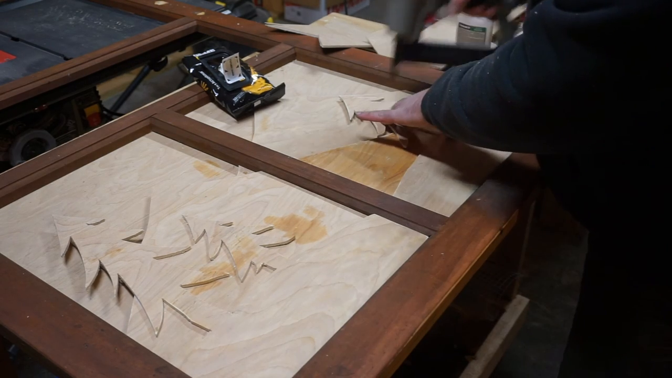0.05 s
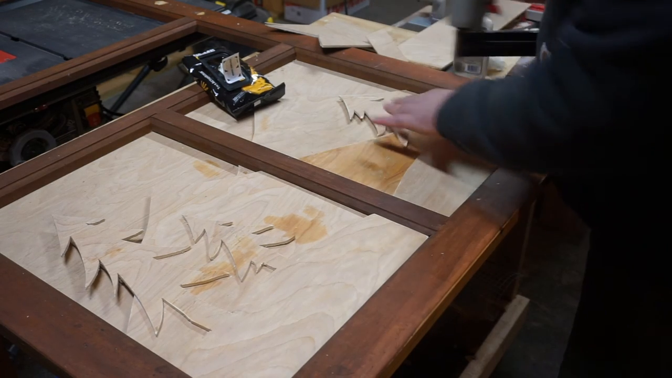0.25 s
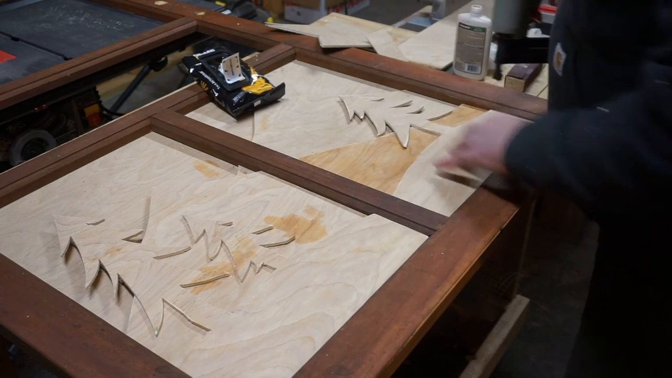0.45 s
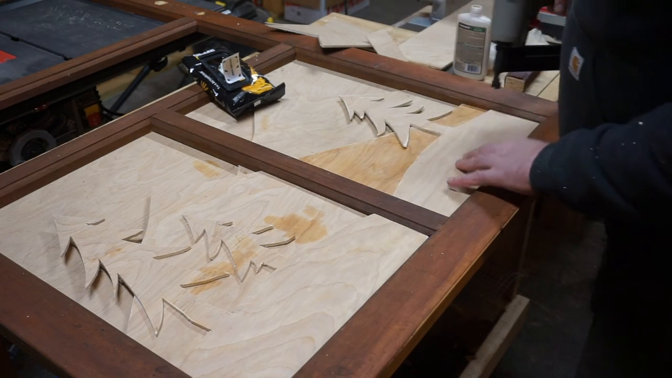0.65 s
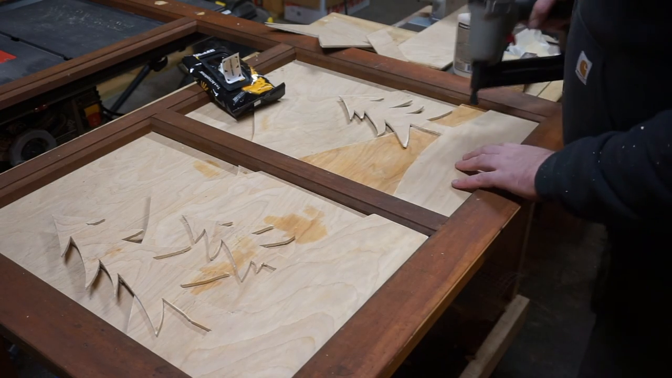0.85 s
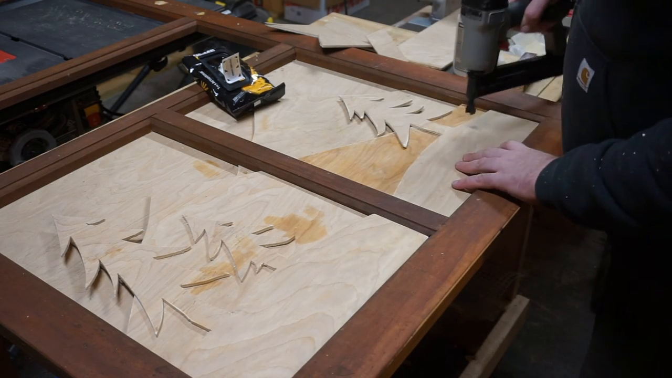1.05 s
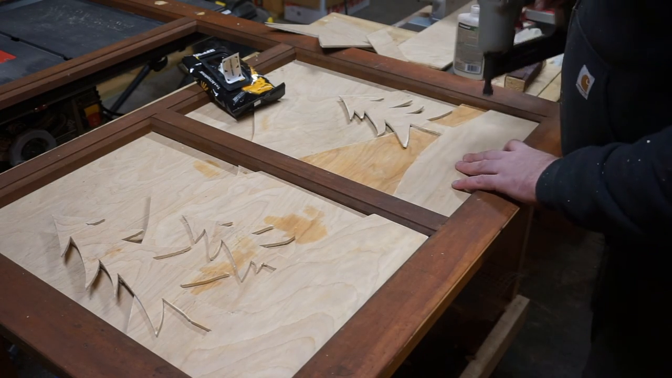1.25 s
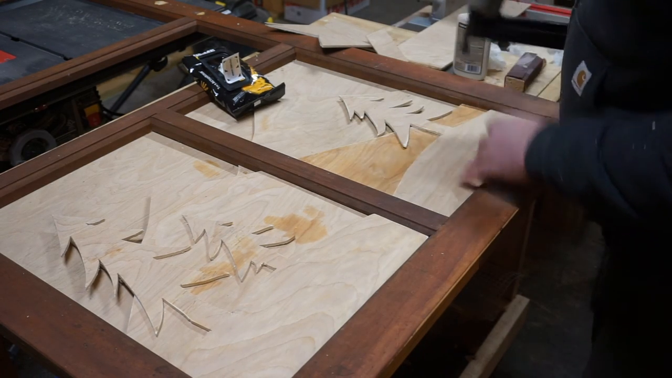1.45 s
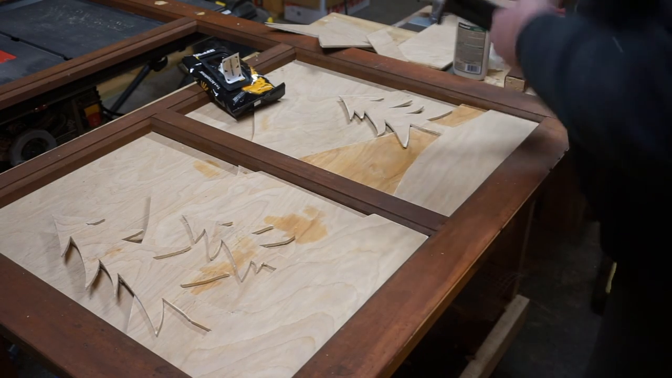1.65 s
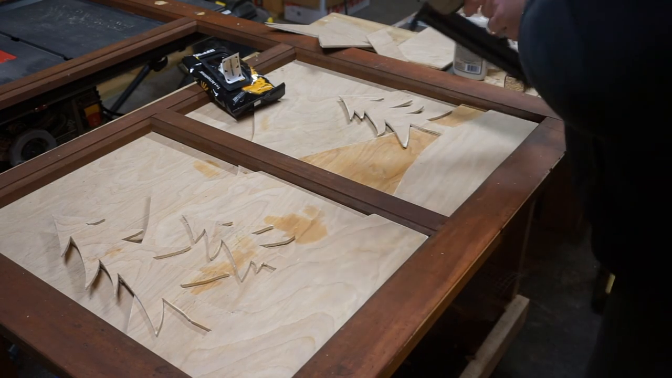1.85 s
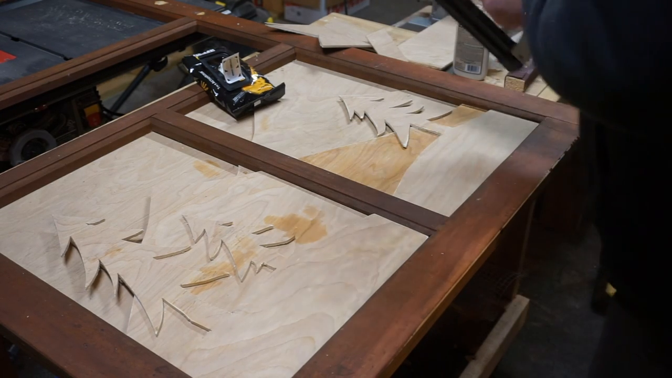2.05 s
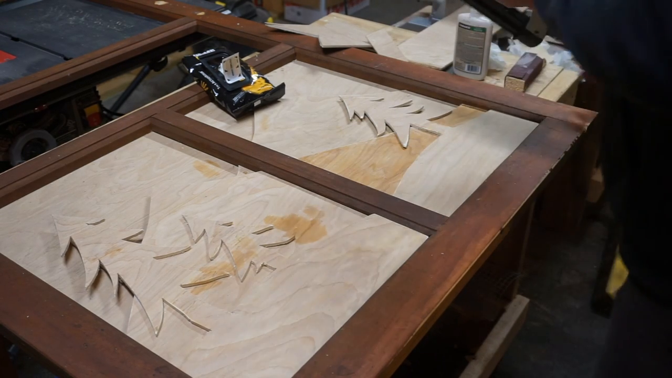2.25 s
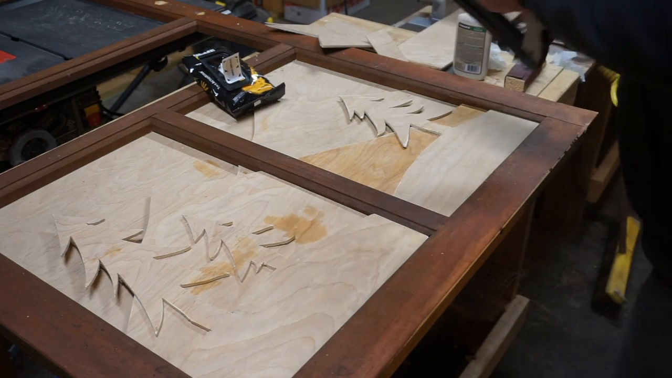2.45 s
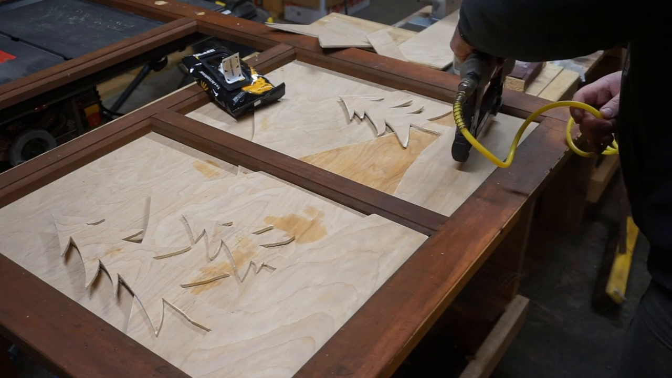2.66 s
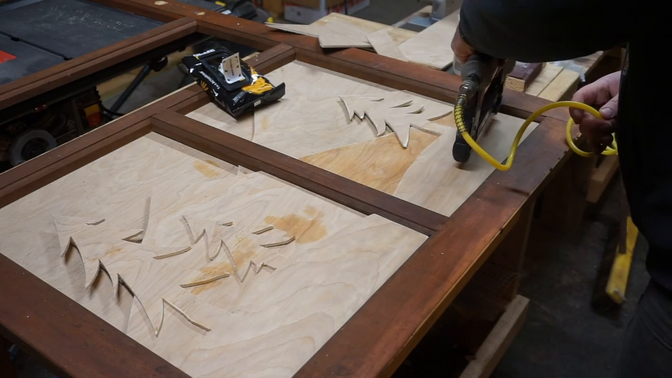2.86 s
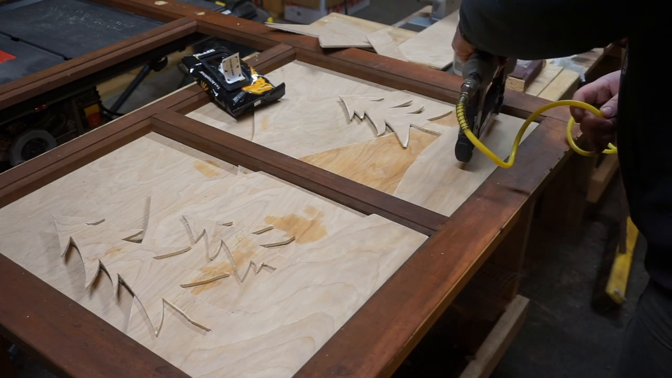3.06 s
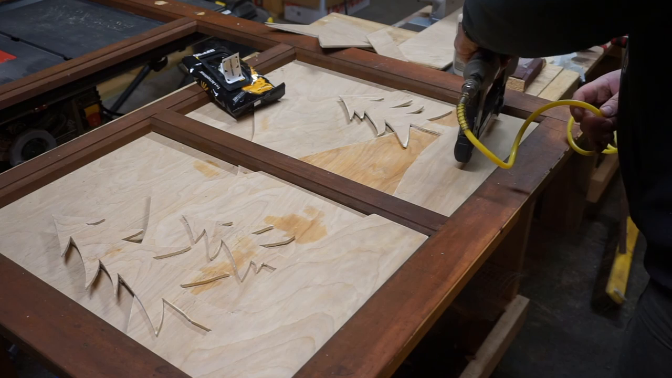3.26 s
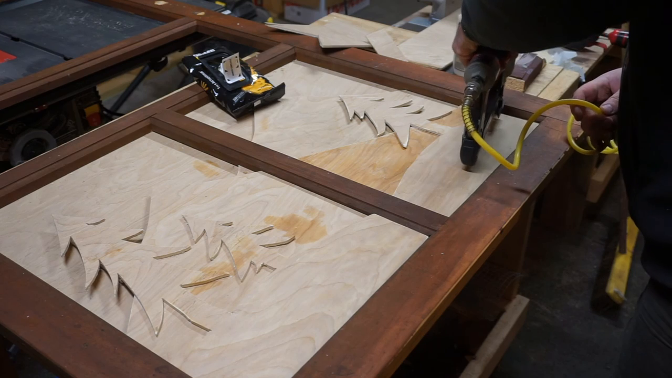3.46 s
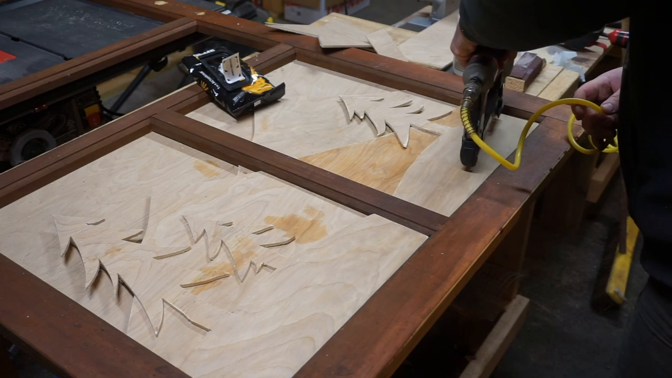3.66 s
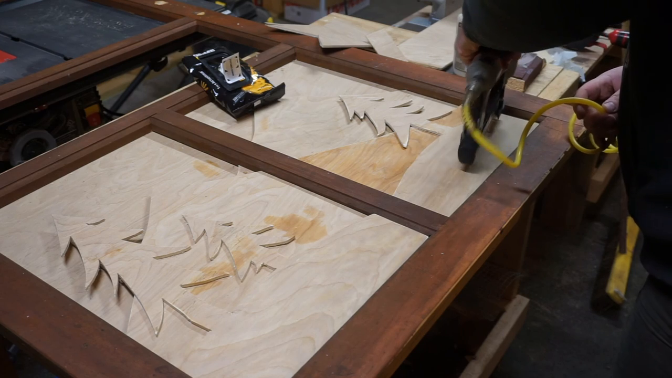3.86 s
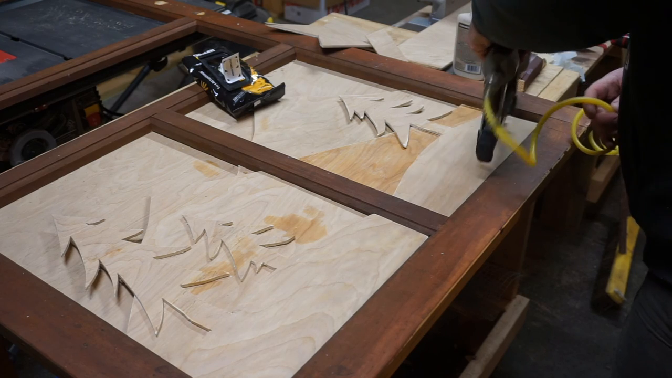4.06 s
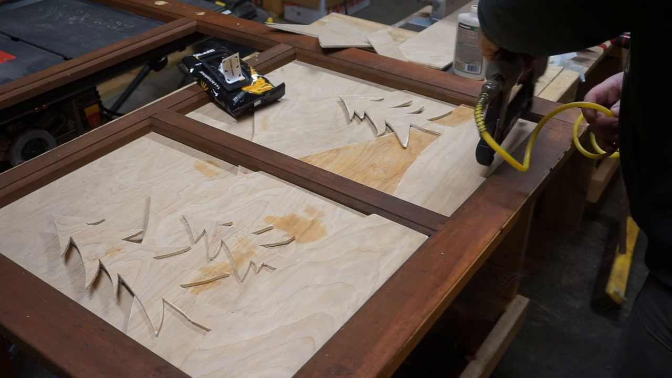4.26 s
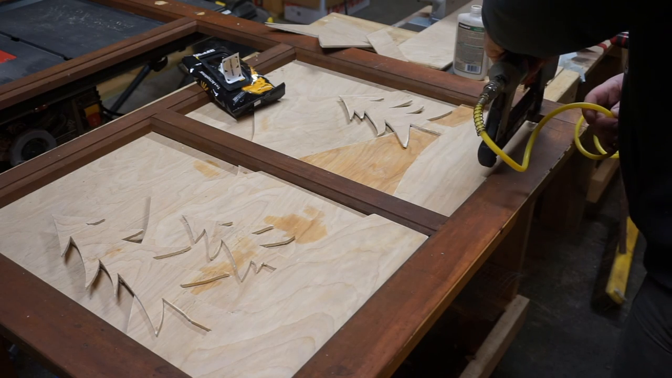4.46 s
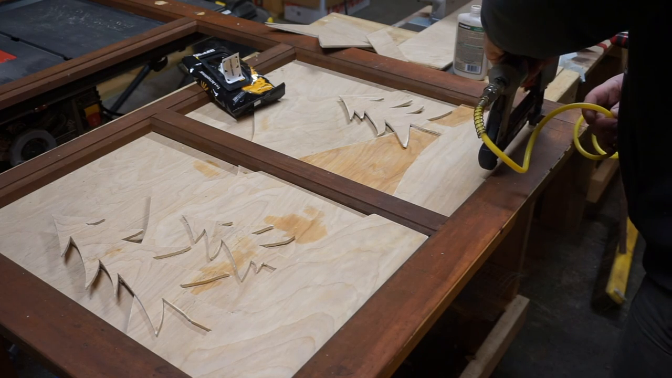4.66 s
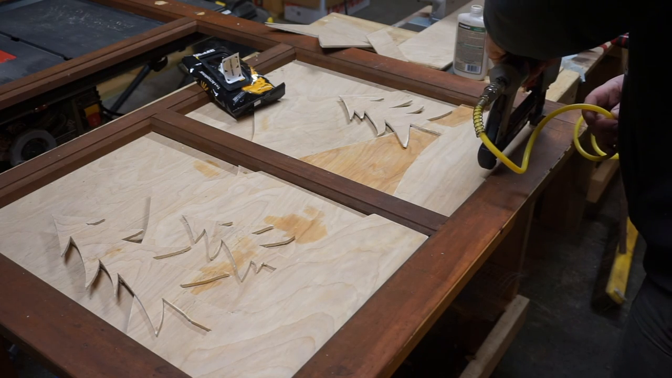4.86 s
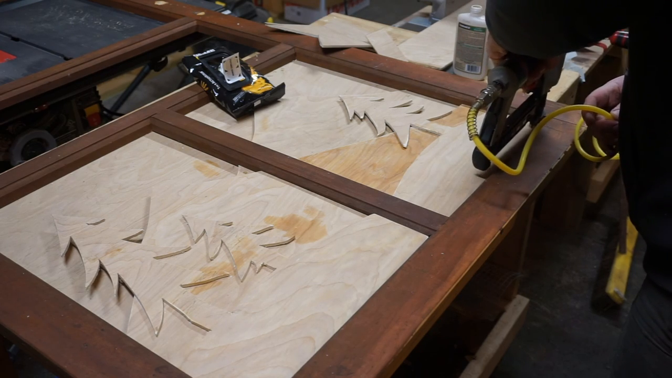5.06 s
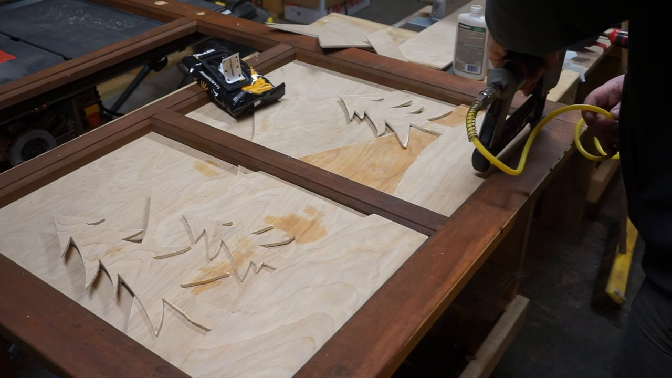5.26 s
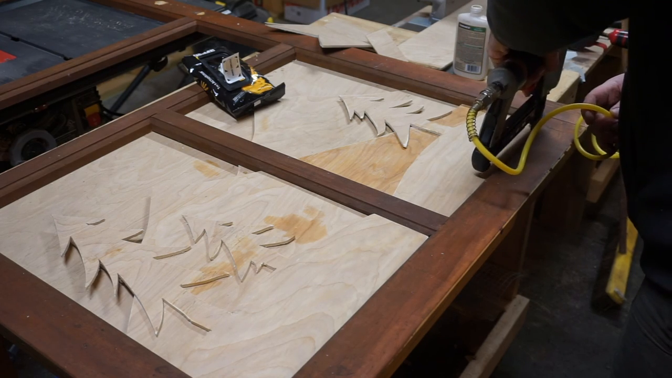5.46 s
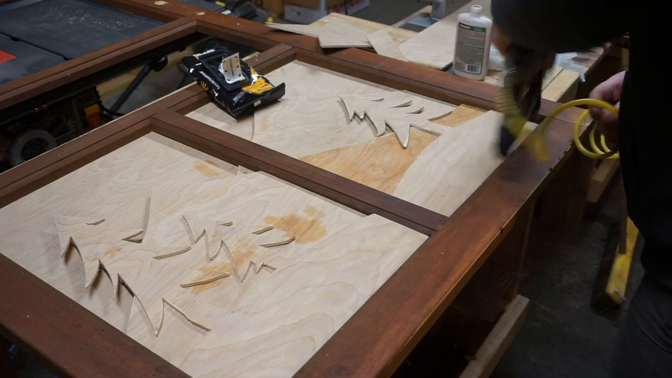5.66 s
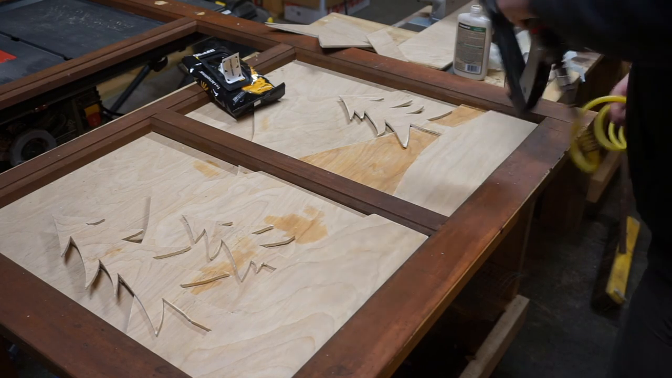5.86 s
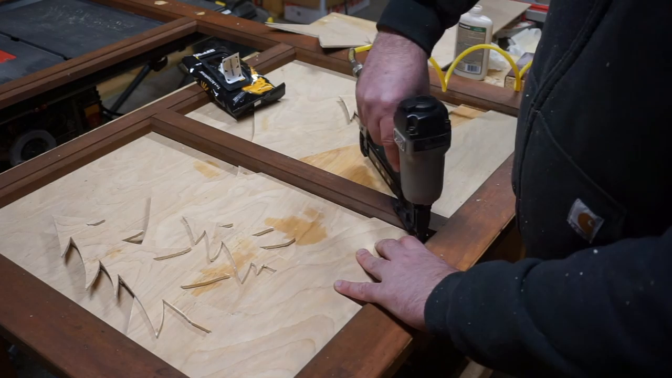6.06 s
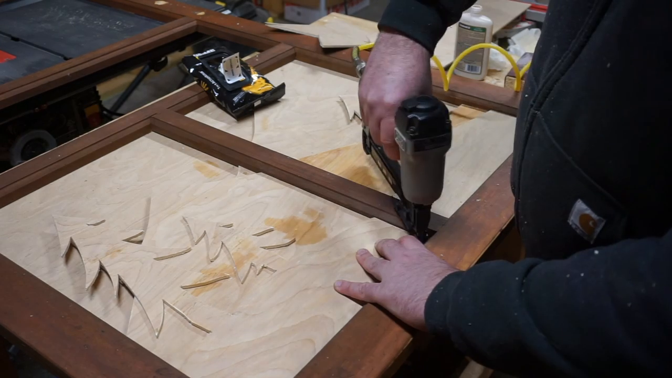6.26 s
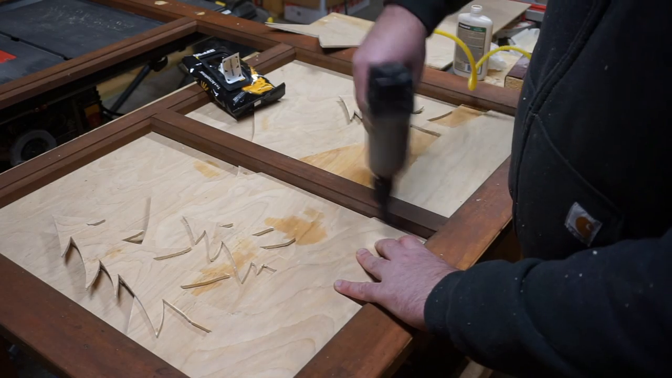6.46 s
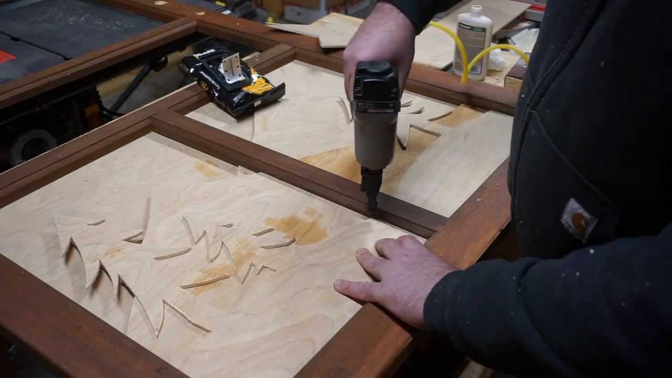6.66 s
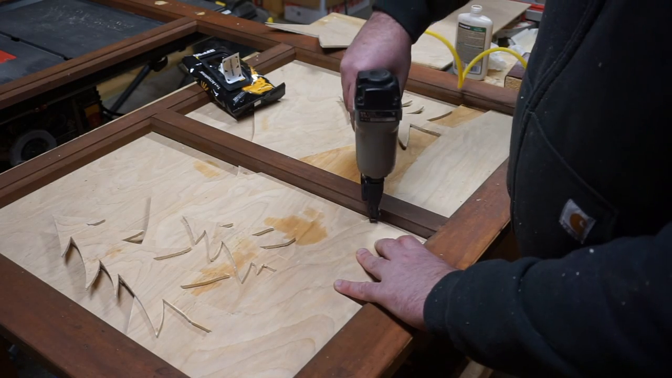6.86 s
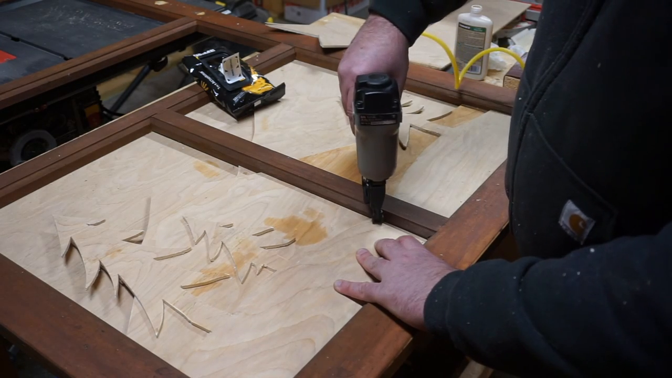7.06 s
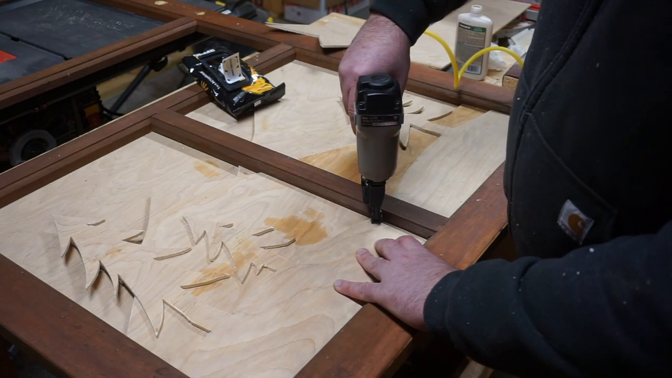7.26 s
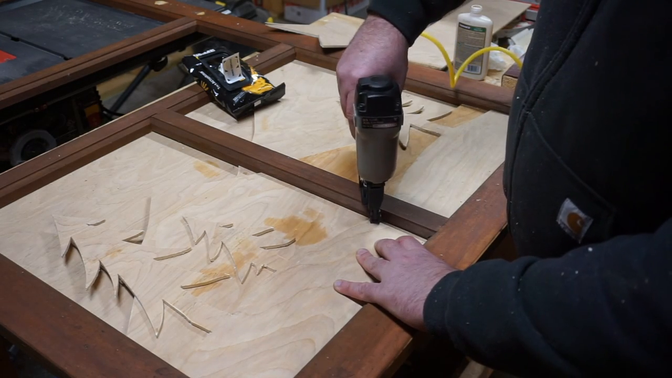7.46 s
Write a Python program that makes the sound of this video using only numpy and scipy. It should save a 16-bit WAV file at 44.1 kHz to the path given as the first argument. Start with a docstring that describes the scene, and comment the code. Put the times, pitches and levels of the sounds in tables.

```python
"""A pneumatic nailer fires into plywood in a hard-walled workshop: a short rush of air, a sharp blow built from
a piston pulse and a crack, then a long noise echo that swells as a gain control lets go.
Between shots, clicks of shaped noise tick, some with a short damped knock or metallic ring, lumpy mid-range
noise swells and fades, and the board groans. A steady floor, a faint metal hum and a soft hiss lie beneath;
hard cuts at edits stop the echoes short."""
import sys
import numpy as np
from scipy import signal
from scipy.io import wavfile
from scipy.ndimage import uniform_filter1d, minimum_filter1d

SR = 44100
rng = np.random.default_rng(int(sys.argv[2]) if len(sys.argv) > 2 else 0)


def to_wav(sig):
    """Store sig (one row per channel, or 1-D mono) as 16-bit WAV at the path in sys.argv[1].

    Samples outside -1..1 are clipped; the rate is SR.
    """
    pcm = np.clip(np.atleast_2d(sig), -1, 1) * 32767
    pcm = np.round(pcm).astype(np.int16)
    wavfile.write(sys.argv[1], SR, pcm.T)  # frames by channels


def invert_db(level):
    """Linear amplitude ratio for a level in decibels (20 dB per decade), elementwise."""
    return 10 ** (np.asarray(level, dtype=float) / 20)


N = 331191

# All levels are those in the mix, ahead of its final gain and the gain control.
# Edits that stop whatever is sounding: (time [s])
CUTS = (1.076, 2.682, 4.822, 6.139, 8.0)
# Left-right likeness of all noise: (frequency [Hz], likeness [0 to 1])
LIKENESS = [(60, 0.98), (170, 0.99), (490, 0.86), (1400, 0.46), (3000, 0.18), (5000, 0.031), (11000, 0.047)]
# Decay of the room by band: (frequency [Hz], t60 [s])
ROOM_DECAY = [(60, 1.6), (170, 1.29), (330, 1.41), (520, 1.41), (900, 1.247), (1300, 1.274), (1650, 1.273),
              (2100, 1.14), (3000, 1.073), (5000, 0.87), (7700, 0.66), (11000, 0.49)]

# Colour of the steady floor: (frequency [Hz], density [dB per Hz])
FLOOR_COLOUR = [(12, -40.5), (20, 0), (970, -22), (1520, -28.5), (2590, -21), (3300, -26.5), (4910, -27),
                (10600, -25.5), (11500, -15.5), (15000, -46.5), (22000, -120)]
FLOOR_DB = -65.5
# Bands of the faint metal hum: (frequency [Hz], width [Hz], level [dB])
HUM_BANDS = [(1540, 50, 0), (1960, 50, -8), (2400, 70, -1), (2780, 150, -7), (3680, 250, -14)]
HUM_HOLD_S, HUM_DB, HUM_FADE_DB_PER_S = .2, -71, 40
# Soft hiss near the microphone: (start [s], rise [s], hold [s], level [dB])
SOFT_HISS = [(2.679, .001, .01, -63.5), (2.676, .001, 2.05, -72), (4.815, .001, 1.3, -77),
             (6.143, .001, .01, -58)]
# Colour of the soft hiss: (frequency [Hz], density [dB per Hz])
SOFT_HISS_COLOUR = [(530, -36.5), (900, -15), (1140, 4), (2230, 0.5), (3840, -6), (10600, -36), (11100, 1),
                    (11500, -48), (15000, -71), (22000, -120)]
SOFT_HISS_FADE_DB_PER_S = 29.5

# Loads of the tool on the board, one list each: (time [s], groan level [dB], deep rumble above it [dB])
LOADS = [
    [(2.68, -61.5, 3.5), (3.044, -58.5, 6.5), (3.216, -61.5, 6), (3.4, -56.5, 4.5), (3.466, -49, -5.5),
     (3.8, -60, 4.5)],
    [(4.98, -69, -5), (5.06, -58.5, -14), (5.12, -62.5, -12), (5.206, -58, -11), (5.31, -58.5, -9.5),
     (5.432, -61.5, -11), (5.6, -73.5, 14)],
    [(6.14, -46.5, -2.5), (6.33, -50, -6)],
]
# Colours of rumble, groan and creak: (frequency [Hz], density [dB per Hz])
RUMBLE_COLOUR = [(30, -28), (60, -17.5), (92, -3), (125, -14.5), (170, -37.5)]
GROAN_COLOUR = [(90, -33.5), (130, 7), (170, -2), (250, 2), (320, -9), (450, -54.5)]
CREAK_COLOUR = [(200, -36), (320, -8.5), (480, -5), (800, -11.5), (1200, -24.5), (2000, -43), (3000, -42)]
# The creak follows groan and a share of the rumble; growth is dB of creak per dB of load.
CREAK_FROM_DB, CREAK_GROWTH, CREAK_RUMBLE_SHARE = -51, 1.73, 0.33

# Swells of lumpy mid-range noise that rise, hold and fade: (start [s], rise [s], hold [s], level [dB])
SWELLS = [(1.443, 0.24, .01, -61), (1.7, 0.17, .02, -58.5), (1.914, 0.12, .01, -46.5),
          (2.098, 0.011, 0.092, -38), (2.474, .01, 0.16, -50.5)]
# Colour of the swelling noise: (frequency [Hz], density [dB per Hz])
SWELL_COLOUR = [(60, -26), (150, -10), (400, -10), (650, -9), (850, -5), (1100, -8.5), (1600, -4),
                (2100, -6.5), (3000, -8.5), (6200, -16.5), (10600, -20), (11500, -13.5)]
SWELL_RISE_DB, SWELL_FADE_DB_PER_S = 15, 49

# Colour of every tick: (frequency [Hz], density [dB per Hz])
TICK_COLOUR = [(180, -30.5), (300, -7.5), (928, -16.5), (1560, -3.5), (3610, -7), (5970, -3), (6540, -6.5),
               (10500, -4), (11500, -7), (15000, -42), (22000, -120)]
# Light ticks of trigger, valve and hose: (time [s], level [dB], tilt [dB per octave])
TICKS = [(1.08, -58.5, -0.5), (2.497, -28, -0.5), (2.508, -33, 1), (2.957, -26, 3), (3.42, -36, -9.5),
         (3.743, -38, -2), (4.824, -53, -11), (4.838, -45, -6), (5.5654, -40, 11.5), (5.5712, -34, 11),
         (5.585, -34.5, 0.5), (6.108, -30, -5), (6.279, -37.5, 3), (7.059, -47.5, 1.5), (7.097, -45, 0)]
# Valve pops as the tool resets after a shot: (time [s], level [dB])
POPS = [(0.045, -6), (4.039, -12.5), (6.446, -6.5)]
POP_TILT_DB_PER_OCTAVE = 13.5
TICK_ROOM_DB, KNOCK_ROOM_DB, POP_ROOM_DB = -21, -23, -31  # echo relative to its tick
TOOL_HZ, TOOL_WIDTH_HZ, TOOL_DB = 2780, 300, 6  # the tool's metal colours the echo of each tick

# Ticks with a short damped knock or metallic ring:
# (time [s], tick level [dB], tick tilt [dB per octave], knock level [dB], knock centre [Hz])
KNOCKS = [(1.648, -51, 1.5, -66, 2700), (1.863, -42, 5, -49, 2800), (2.012, -41, 2, -42, 805),
          (2.105, -51, -4, -52, 840), (2.4835, -24.5, 0, -43, 1400), (2.867, -40, -9, -39.5, 500),
          (2.9687, -27.5, -9, -33, 500), (3.02, -40, -9, -51, 150), (3.278, -33, -8.5, -35.5, 480),
          (3.424, -51, -0.5, -19.5, 252), (3.767, -30, 1, -35, 150), (5.0349, -53, -1.5, -46, 150),
          (5.1251, -40, -6, -43.5, 850), (5.299, -66, 0, -50.5, 110), (6.264, -47, -3, -49, 290),
          (6.2975, -23, 3, -26.5, 250), (7.0226, -25.5, -5.5, -30.5, 1400), (7.498, -48, -1.5, -42, 180)]
# Damped modes of a knock, as of a plywood panel: (frequency [Hz], level [dB], t60 [s])
KNOCK_MODES = [(94, 3, 0.62), (150, -1.5, 0.2), (201, -12, 0.15), (270, -2.5, 0.053), (346, -2, 0.06),
               (494.4, 9, 0.059), (560, -1, 0.089), (825, -5.5, 0.22), (890, -7.5, 0.24), (1400, -7, 0.074),
               (2500, -6, .05), (2800, -5.5, 0.14)]

# Shots: (blow time [s], hiss level [dB], echo level [dB], first echoes above it [dB],
# echo tilt [dB per octave], echo bass lift [dB])
SHOTS = [(-.12, -30.5, -1, 9, 2, 5), (3.8071, -24.5, -4, 16, 1, -2), (5.6247, -27.5, -5.5, 14, 1.5, -0.5),
         (6.3396, -22, -2.5, 6.5, 1, -5)]
# Colour of the air rush: (frequency [Hz], density [dB per Hz])
AIR_COLOUR = [(200, -10.5), (1400, -27.5), (2300, -5.5), (3500, -4), (5000, -9), (7000, -1.5), (8500, -1.5),
              (10000, 7.5), (11500, -7.5)]
# Colour of the shot's echo: (frequency [Hz], density [dB per Hz])
ECHO_COLOUR = [(18, -57), (30, -25.5), (72, -7), (144, -7.5), (189, -3.5), (420, -5), (580, -4), (843, -9),
               (1690, -7), (2400, -10.5), (2850, -11), (10700, -24), (11500, -28.5), (15000, -64.5),
               (22000, -120)]
# Resonances of the room in the echo: (frequency [Hz], width [Hz], lift [dB])
ROOM_MODES = [(180, 13, 4.5), (326, 27, 4.5), (450, 9.1, 4), (586, 21, 5.5), (824, 44, 3), (895, 10, 5),
              (1277, 22, 6), (1377, 44, 3.5), (1550, 230, 4), (1683, 100, 6), (1940, 25, 4),
              (2210, 40, 4.5), (2610, 160, 4), (3600, 62, 2), (4620, 180, 4)]
AIR_LEAD_S = .030  # air rushes this long before the blow
BLOW_DB = 24.5  # drive of the blow over the long echo, ahead of the trims of push and crack


def read(points, hz):
    """Reads a spectrum table on a log frequency axis."""
    f, value = np.transpose(points)
    return np.interp(np.log(hz + 1), np.log(f + 1), value)


def resonance(hz, centre, width):
    """Power response of a single resonance, 1 at its centre."""
    return 1 / (1 + (2 * (hz - centre) / width) ** 2)


def next_cut(s):
    """Time of the first edit after s."""
    return min(cut for cut in CUTS if cut > s)


def add(mix, s, sound):
    """Mixes a stereo sound in at s; it stops at the next edit."""
    at, end = round(s * SR), round(next_cut(s) * SR)
    sound = sound[:, max(-at, 0):end - at]
    part = mix[:, max(at, 0):][:, :sound.shape[1]]
    part += sound[:, :part.shape[1]]


def noise(count, shape_db, lumpy_db=0., size=512):
    """Stereo noise shaped by shape_db(Hz, s), scaled to rms 1 for the shape at s = 0."""
    lumps = invert_db(lumpy_db * rng.standard_normal(count + size))  # makes single echoes stand out
    raw = rng.standard_normal((2, count + size)) * lumps
    overlap = size * 3 // 4
    hz, t, z = signal.stft(raw / np.std(raw), SR, nperseg=size, noverlap=overlap)
    hz = hz[:, None]
    same = np.clip(read(LIKENESS, hz), 0, 1)
    z = np.array([z[0], same * z[0] + np.sqrt(1 - same ** 2) * z[1]])
    rms = np.sqrt(np.mean(invert_db(shape_db(hz, 0.)) ** 2))
    z *= invert_db(shape_db(hz, t)) / rms
    return signal.istft(z, SR, nperseg=size, noverlap=overlap)[1][:, :count]


def steady(spectrum, lumpy_db=0., wobble_db=0., size=300):
    """Noise of one colour for the whole scene, its level wobbling at random."""
    wobble = uniform_filter1d(rng.standard_normal(N), size) * np.sqrt(size)
    coloured = noise(N, lambda f, s: read(spectrum, f) + 0 * s, lumpy_db, size=2048)
    return coloured * invert_db(wobble_db * wobble)


def swell(start, rise, hold, db, fade_db, rise_db=0.):
    """Gain over time: rise, hold, then a steady fade in dB per second; it stops at the next edit."""
    t = np.arange(N) / SR
    rising = rise_db * np.minimum((t - start) / rise - 1, 0)
    fading = fade_db * np.maximum(t - start - rise - hold, 0)
    return invert_db(db + rising - fading) * (t >= start) * (t < next_cut(start + hold / 2))


def curve(rows, law):
    """Gain over time from law(columns), silent outside the rows."""
    s, *columns = np.transpose(rows)
    return invert_db(np.interp(np.arange(N) / SR, s, law(*columns), -200, -200))


def room_floor():
    """Steady coloured noise under the whole scene."""
    return invert_db(FLOOR_DB) * steady(FLOOR_COLOUR)


def metal_hum():
    """Something metal hums faintly: noise in narrow resonant bands, its level trembling, from the first edit."""
    def bands(f, s):
        power = sum(invert_db(db) ** 2 / w * resonance(f, hz, w) for hz, w, db in HUM_BANDS)
        return 10 * np.log10(power) + 0 * s

    envelope = swell(CUTS[0], .001, HUM_HOLD_S, HUM_DB, HUM_FADE_DB_PER_S)
    tremble = invert_db(60 * uniform_filter1d(rng.standard_normal(N), size=600))
    return noise(N, bands, size=2048) * envelope * tremble


def soft_hiss():
    """Noise near the microphone that holds, then fades at a steady rate."""
    envelope = sum(swell(*row, SOFT_HISS_FADE_DB_PER_S) for row in SOFT_HISS)
    return envelope * steady(SOFT_HISS_COLOUR)


def board_groan():
    """One load on the board drives a deep rumble, a groan and a creak that grows faster than they do."""
    def rumble(db, deep_db):
        return db + deep_db

    def groan(db, deep_db):
        return db

    def creak(db, deep_db):
        return CREAK_FROM_DB + CREAK_GROWTH * (db + CREAK_RUMBLE_SHARE * deep_db - CREAK_FROM_DB)

    layers = ((rumble, RUMBLE_COLOUR), (groan, GROAN_COLOUR), (creak, CREAK_COLOUR))
    return sum(sum(curve(rows, law) for rows in LOADS) * steady(colour, wobble_db=2.0, size=1200)
               for law, colour in layers)


def noise_swells():
    """Lumpy mid-range noise that rises, holds and fades; overlapping swells sum in power."""
    power = sum(swell(*row, SWELL_FADE_DB_PER_S, SWELL_RISE_DB) ** 2 for row in SWELLS)
    return np.sqrt(power) * steady(SWELL_COLOUR, lumpy_db=3., wobble_db=1.0)


def tick(tick_db, tilt_db, room_db):
    """A short bright click of noise and a little room, which dies band by band."""
    t = np.arange(SR // 2) / SR

    def click_colour(f, s):
        return read(TICK_COLOUR, f) + tilt_db * np.log2(f / 3000 + 0.18) + 0 * s

    def echo_colour(f, s):
        metal = TOOL_DB * resonance(f, TOOL_HZ, TOOL_WIDTH_HZ)
        return click_colour(f, s) + metal - 60 * s / np.clip(read(ROOM_DECAY, f), .3, 3)

    near = noise(len(t), click_colour, size=256)
    near *= np.minimum(t / .0008, 1) * (invert_db(-2 - 3600 * t) + invert_db(-22 - 500 * t))  # sharp fall, then a faint tail
    echo = noise(len(t), echo_colour) * np.minimum(t / 0.0057, 1)
    return invert_db(tick_db) * (near + invert_db(room_db) * echo)


def ticking_knock(tick_db, tilt_db, knock_db, knock_hz):
    """A tick with a short knock or metallic ring: damped sine modes, favoured near the knock's centre."""
    t = np.arange(SR // 2) / SR
    modes = 0
    for hz, db, t60 in KNOCK_MODES:
        off_centre_db = 9.2 * abs(np.log2(hz / knock_hz))
        modes = modes + invert_db(db - off_centre_db - 60 * t / t60) * np.sin(2 * np.pi * hz * t)
    knock = invert_db(knock_db) * np.minimum(t / 0.0017, 1) * modes / abs(modes).max()
    return tick(tick_db, tilt_db, KNOCK_ROOM_DB) - knock


def air_rush(hiss_db):
    """Air rushes to the piston: fading noise whose level flutters as the valve pops open and chatters."""
    count = round(AIR_LEAD_S * SR)
    t = np.arange(count) / SR
    flutter = 1 + 0.18 * np.cos(2 * np.pi * 130 * t) + 0.31 * np.exp(-t / 0.0033)
    return invert_db(hiss_db - 40 * t) * flutter * noise(count, lambda f, s: read(AIR_COLOUR, f) + 0 * s)


def blow(t):
    """The piston bottoms out in a smooth pulse, then the driver cracks as fast-fading random signs."""
    push = -invert_db(-6) * np.exp(-((t - .0012) / .0002) ** 2)
    signs = np.sign(rng.standard_normal((2, len(t))))
    crack = signs * invert_db(-3 - 3000 * (t - .0032)) * (t > .0032)
    return invert_db(BLOW_DB) * (push + crack)


def shot_echo(t, early_db, tilt_db, bass_db):
    """The room answers with fast-fading first echoes over a long tail whose treble dies first."""
    def colour(f):
        body = 1 + sum((invert_db(db) ** 2 - 1) * resonance(f, hz, w) for hz, w, db in ROOM_MODES)
        tilt = tilt_db * np.log2(f / 1500 + 0.15)
        bass = bass_db / (1 + (f / 320) ** 2)
        return read(ECHO_COLOUR, f) + 10 * np.log10(body) + tilt + bass

    def aged(f, s):  # the fall steepens with time
        return 60 * (.2 - s - 0.16 * s ** 2) / np.clip(read(ROOM_DECAY, f), .3, 3)

    def early_colour(f, s):
        return colour(f) + aged(f, 0) + 2.0 * np.log2(f / 1500 + .02) + 0 * s

    late = noise(len(t), lambda f, s: colour(f) + aged(f, s), lumpy_db=3.0, size=2048)
    early = noise(len(t), early_colour, lumpy_db=2.0)
    arrive = np.clip((t - .006) / 0.009, 0, 1)
    return arrive * (late + invert_db(early_db - 327 * t) * early)


def shot(hiss_db, echo_db, early_db, tilt_db, bass_db):
    """Air rushes to the piston, the driver hits, and the room answers."""
    t = np.arange(2 * SR) / SR
    hit = invert_db(echo_db) * (blow(t) + shot_echo(t, early_db, tilt_db, bass_db))
    return np.hstack([air_rush(hiss_db), hit])


def scene():
    """All sources in the workshop, from the background to the shots."""
    mix = room_floor() + metal_hum() + soft_hiss() + board_groan() + noise_swells()
    for s, *rest in TICKS:
        add(mix, s, tick(*rest, TICK_ROOM_DB))
    for s, db in POPS:
        add(mix, s, tick(db, POP_TILT_DB_PER_OCTAVE, POP_ROOM_DB))
    for s, *rest in KNOCKS:
        add(mix, s, ticking_knock(*rest))
    for s, *rest in SHOTS:
        add(mix, s - AIR_LEAD_S, shot(*rest))
    return mix * invert_db([[.4], [-.4]])  # left 0.4 dB up, right 0.4 dB down


def top_cut(x):
    """Nothing passes above the cut-off."""
    return signal.sosfilt(signal.butter(12, 12220, fs=SR, output="sos"), x)


def record(dry):
    """Gain control, most alert to treble, drops just ahead of each blow and climbs back; band limits frame it."""
    edge = signal.firwin(127, 11170, window=("kaiser", 5), fs=SR)[None]
    rumble_cut = signal.butter(2, 55, "high", fs=SR, output="sos")
    heard = signal.sosfilt(rumble_cut, signal.oaconvolve(dry, edge, "same"))
    treble = signal.sosfilt(signal.butter(2, 3500, "high", fs=SR, output="sos"), heard)
    peak = -minimum_filter1d(-abs(treble).max(0), size=300)
    over_db = 20 * np.log10(peak + 1e-9) + 10.5  # above a threshold of -10.5 dB
    over_db[over_db < 0] = -60
    over_db[0] = 8.0  # still down from the blow just before the start
    fall = np.arange(N) / SR * 265  # release in dB, at 265 dB per second
    left_db = np.maximum.accumulate(over_db + fall) - fall
    knee_db = 2.0
    cut_db = knee_db * np.logaddexp(0, left_db / knee_db)  # the last dB come back slowly
    held = heard / invert_db(uniform_filter1d(cut_db, size=120))
    finished = signal.oaconvolve(held, edge, "same")
    return top_cut(finished)


dry = scene()
out = record(dry)
to_wav(out)
```